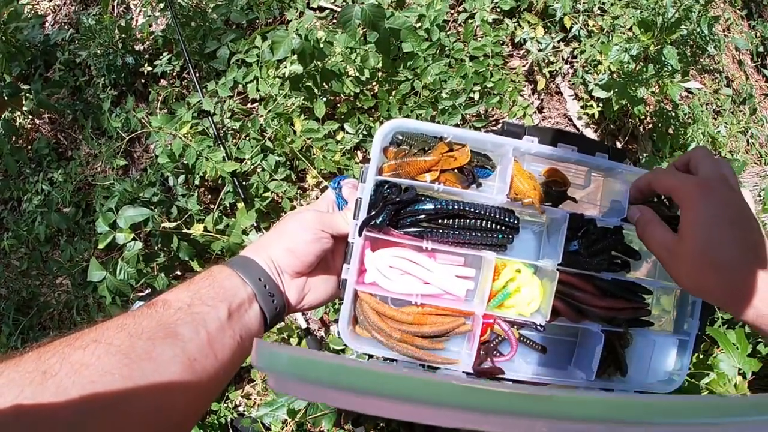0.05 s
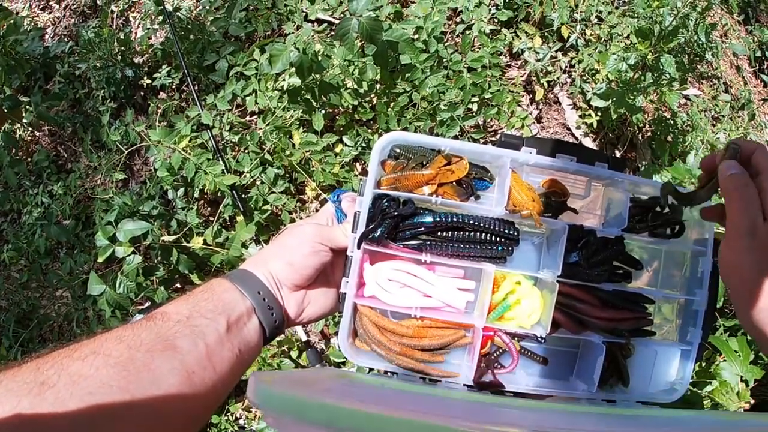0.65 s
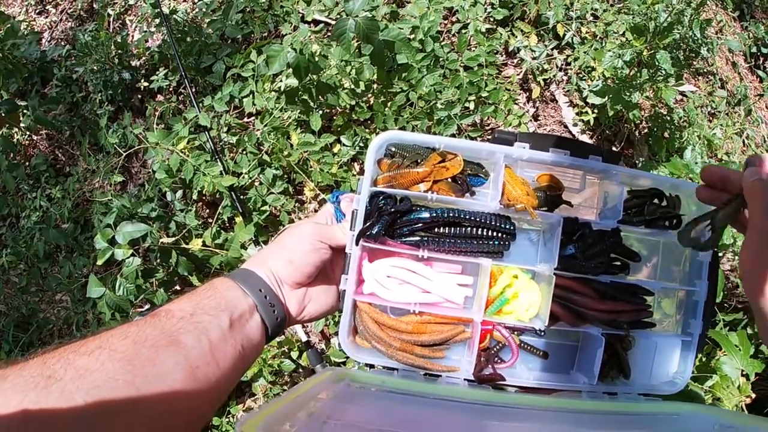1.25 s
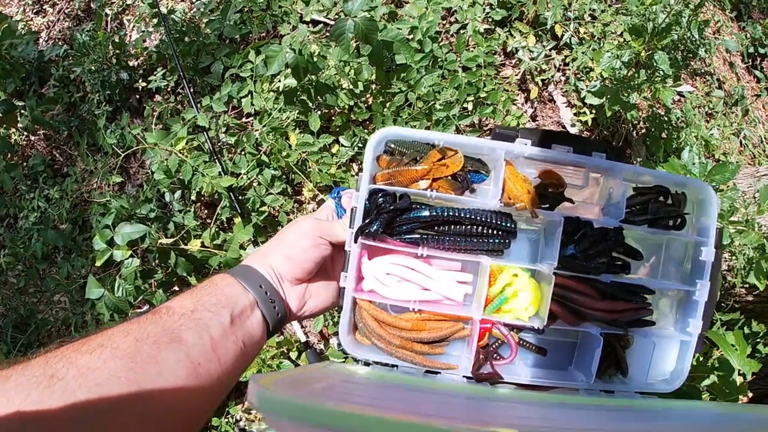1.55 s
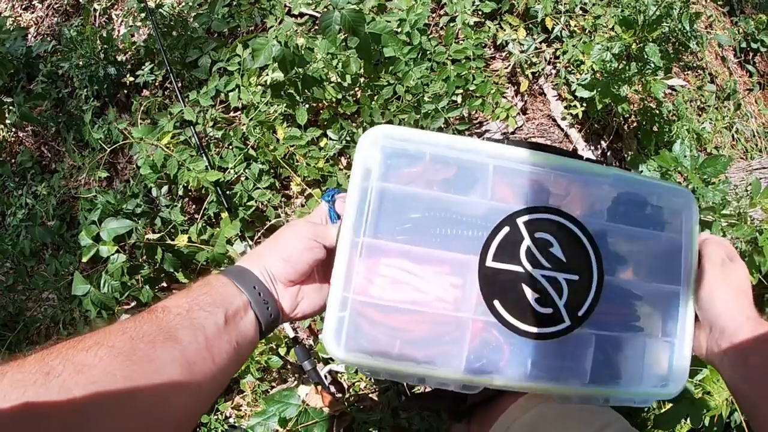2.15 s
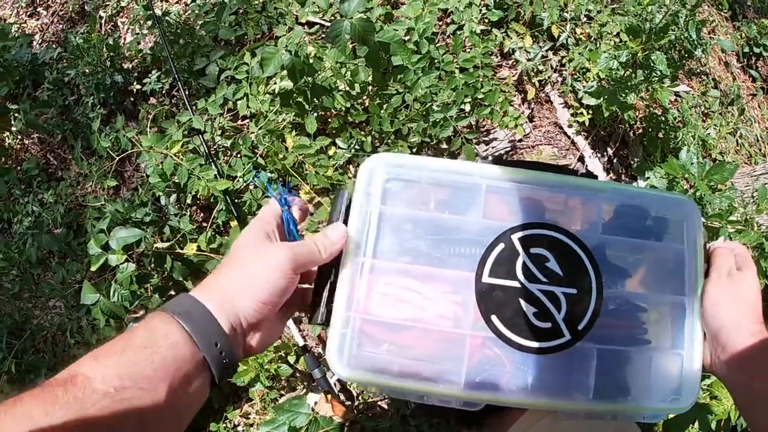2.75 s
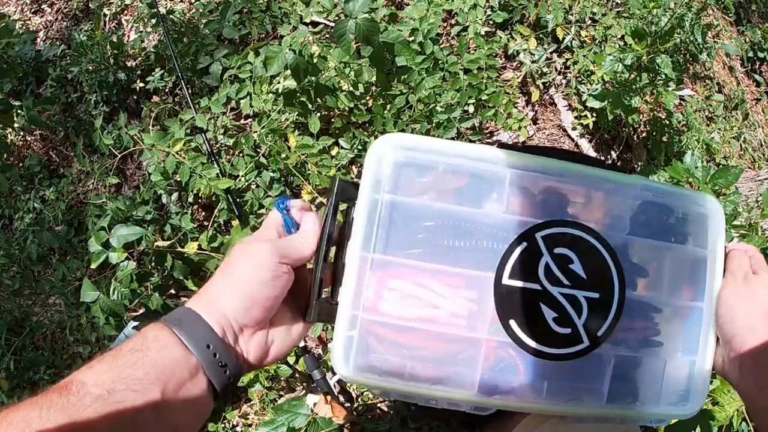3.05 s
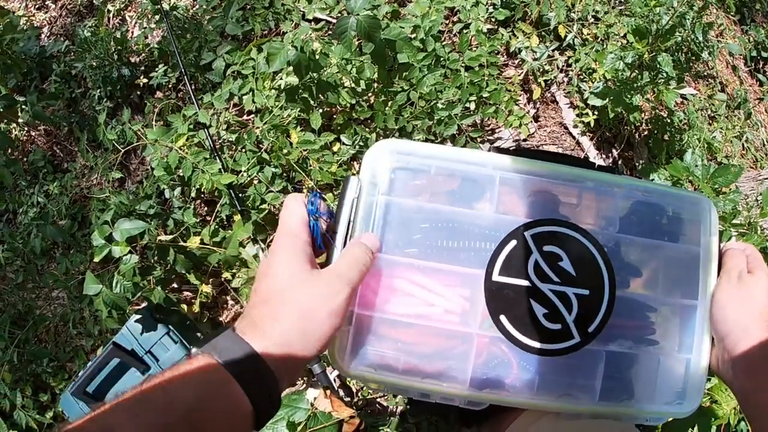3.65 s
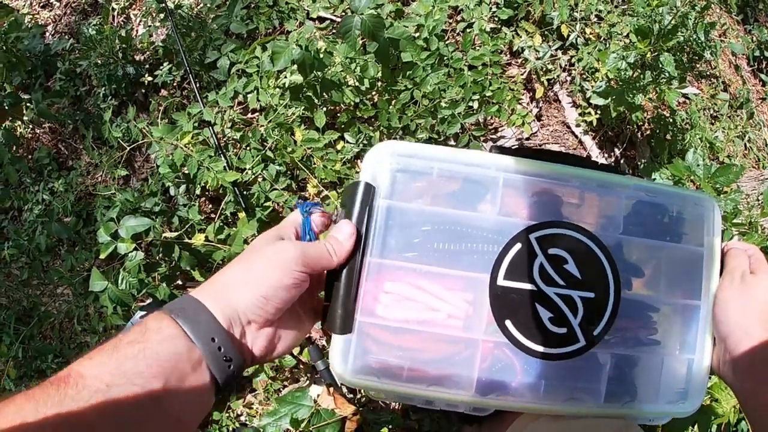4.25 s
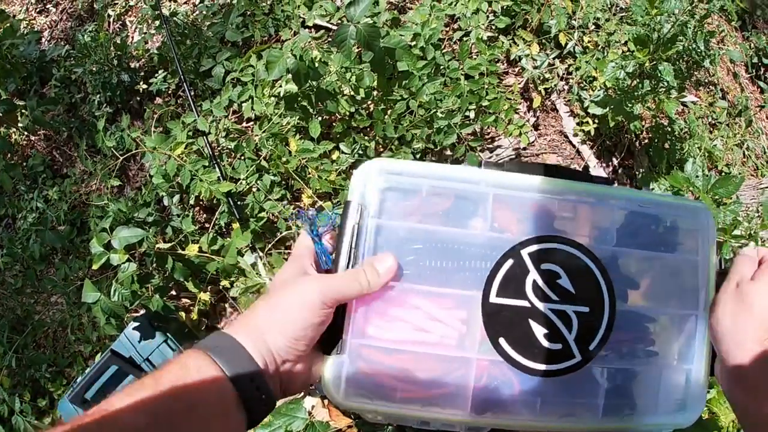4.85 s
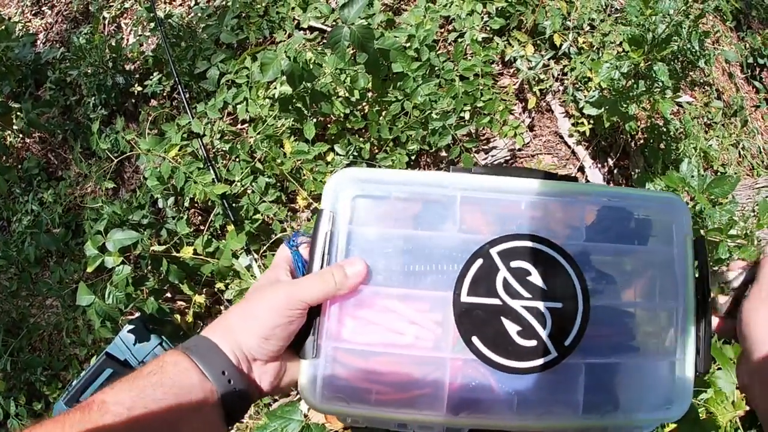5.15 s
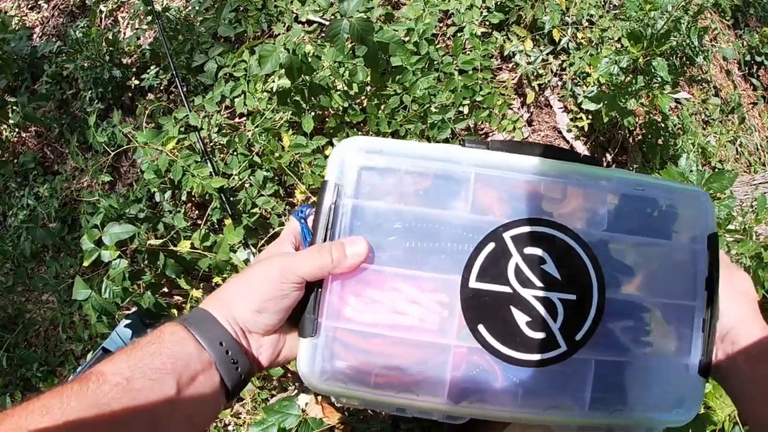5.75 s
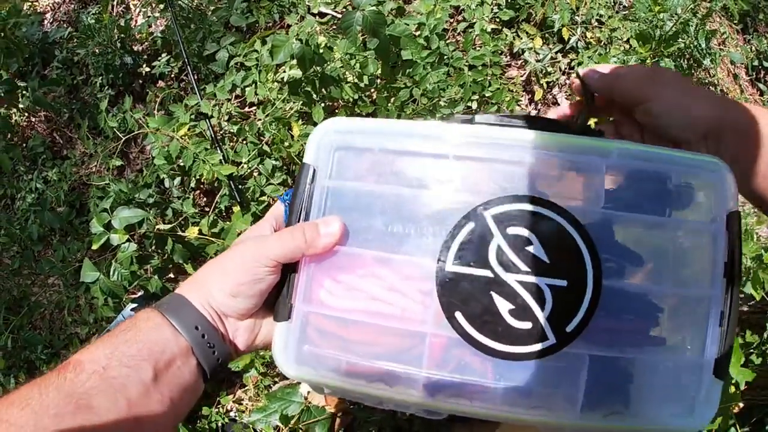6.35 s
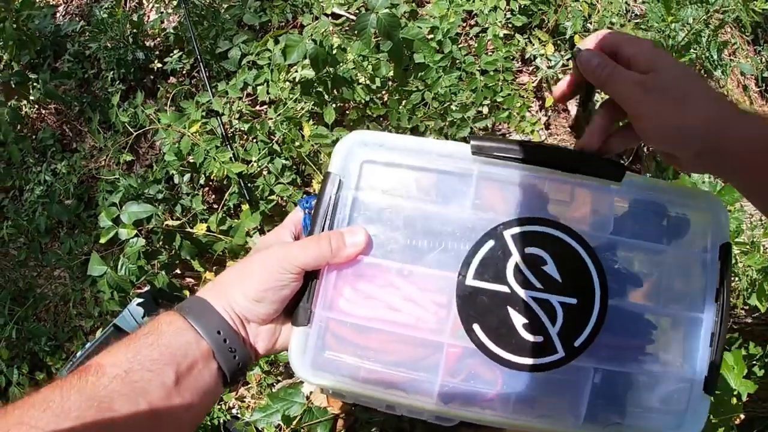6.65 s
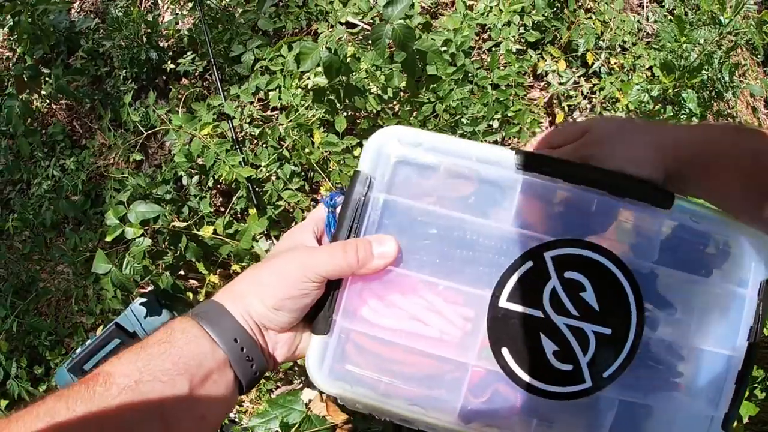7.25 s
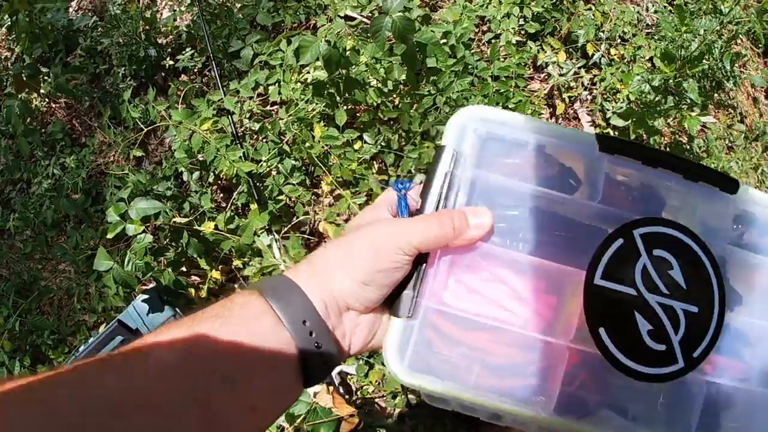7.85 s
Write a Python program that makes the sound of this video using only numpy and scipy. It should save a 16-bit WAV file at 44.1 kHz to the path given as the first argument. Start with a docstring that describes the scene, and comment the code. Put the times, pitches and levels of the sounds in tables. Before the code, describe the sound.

Light clicks in a plastic tackle box, then the lid knocks shut and latches snap closed one by one over faint outdoor air.

```python
"""A tackle box by a pond

Close by, fingers rub a plastic box and pick a lure from its tray with light clicks. The lid swings,
drops shut with a puff of air and is pressed down. The latches snap home, each with a crack of the
thin walls and a thump of the shell. Behind are soft air, a far engine and a thin insect trill."""
import sys
import numpy as np
from scipy import signal
from scipy.fft import rfft, irfft
from scipy.io import wavfile
from scipy.ndimage import map_coordinates

SR = 44100
rng = np.random.default_rng(int(sys.argv[2]) if len(sys.argv) > 2 else 0)


def unload_wav(signal):
    """Save mono or channel-first audio to the path in sys.argv[1] as 16-bit WAV at rate SR, clipped to [-1, 1]."""
    wavfile.write(
        sys.argv[1],
        SR,
        np.round(np.clip(np.atleast_2d(signal).T, -1, 1) * 32767).astype(np.int16),
    )


N = 357210
TIME = np.arange(N) / SR
HIT_TIME = TIME[:SR // 9]   # the time axis of one short contact

# A crack has a level in the mid treble; its "hollow" band lies below that and its "top" band above.
# Hard blows of lid, latch or hand on the shell:
# t/s, crack level/dB, hollow band against crack/dB, crack fade time/s, thump level/dB, thump f/Hz
BLOWS = [(0.36, -64.5, 17, 0.018, -35, 262), (1.6364, -46.5, 8.5, 0.037, -31, 326),
         (1.9326, -43, 8, 0.086, -27, 308), (1.9979, -44.5, 6, 0.045, -23, 551),
         (2.0213, -40.5, 4, 0.2, -8.5, 557), (2.0761, -38.5, -2.5, 0.048, -40, 178),
         (2.2385, -46.5, 0.5, 0.27, -8.5, 363), (2.272, -45.5, 2, 0.064, -21.5, 380),
         (2.316, -52, 7.5, 0.014, -31.5, 598), (2.457, -33.5, 0, 0.018, -21, 346),
         (2.536, -39.5, 5, 0.011, -26, 194), (2.7888, -44, -1.5, 0.13, -28.5, 366),
         (2.8129, -38.5, -6, 0.038, -19, 435), (3.1465, -47, -1, 0.013, -30.5, 388),
         (3.1921, -31.5, -1, 0.037, -10, 475), (3.2147, -33, -2.5, 0.018, -18, 319),
         (3.295, -59, 4, 0.018, -29.5, 354), (3.4456, -52.5, 7, 0.078, -23.5, 427),
         (3.5755, -56, 5.5, 0.04, -37, 366), (3.6353, -49.5, 0, 0.029, -23, 336),
         (4.005, -49.5, 3.5, 0.012, -23.5, 368), (4.0547, -39.5, -6.5, 0.015, -19.5, 313),
         (4.4324, -57, 9.5, 0.015, -29, 341.5), (5.05, -39.5, -3, 0.054, -22.5, 342),
         (5.143, -53.5, 3.5, 0.039, -36, 394), (5.4895, -29.5, -6, 0.0146, -16.5, 548),
         (6.212, -47.5, -3, .11, -31.5, 219), (6.44, -58, 0.5, 0.032, -27.5, 340.5),
         (6.572, -35.5, -4.5, 0.018, -10, 382), (6.61, -39, -4.5, 0.019, -15.5, 383),
         (6.857, -45, -4.5, .025, -15.5, 358), (7.1629, -77.5, 8.5, 0.027, -41, 379.5)]
# Latches going over their catch: t/s, strike level/dB, hollow band against strike/dB, top band
# against strike/dB, travel time/s, release against strike/dB, thump level/dB, thump f/Hz, ping f/Hz
LATCH_SNAPS = [(4.18, -29.5, -12.5, -3, .0017, -2, -9.5, 282.6, 3800),
               (4.555, -23.5, -6, -9, .0019, 1, -9, 337, 1995),
               (5.849, -24, 2, -5.5, 0.0023, -11, -5.5, 264, 734),
               (6.8756, -40, -4, 0, 0.0017, 8, -17, 290, 3600),
               (7.225, -28.5, -1.5, -7.5, 0.0022, -4.5, -2.5, 319, 814)]


def from_db(db):
    """Turn decibels into a factor to multiply by."""
    return 10 ** (np.asarray(db) / 20)


def rms_one(x):
    """Scale a sound so that its average strength (rms) is 1."""
    return x / np.sqrt(np.mean(x ** 2) + 1e-20)


def fade(t60, db=0):
    """The dying away of one contact: it starts at db and loses 60 dB every t60 seconds."""
    return from_db(db - 60 * HIT_TIME / t60)


def in_time(rows):
    """Join a table's points with straight lines: one curve for each column after the time."""
    times, *columns = np.transpose(rows)
    return [np.interp(TIME, times, column) for column in columns]


def band(x, low_hz, high_hz, order=2):
    """Keep the part of a sound between two frequencies."""
    edges_hz = [low_hz, min(high_hz, SR / 2 - 1)]
    return signal.sosfilt(signal.butter(order, edges_hz, "band", fs=SR, output="sos"), x + 1e-18)


def coloured(x, spectrum):
    """Shape the lows and highs of a steady sound by rows of f/Hz, level/dB; the result has rms 1."""
    hz, db = np.transpose(spectrum)
    log_hz = np.log(np.fft.rfftfreq(N, 1 / SR) + 1)
    gain = from_db(np.interp(log_hz, np.log(hz), db, left=-120, right=-120))
    return rms_one(irfft(rfft(x) * gain, N))


def drift(rate, size=N):
    """Wander smoothly, mostly between -1 and 1, through `rate` random values a second."""
    steps = np.arange(size) * rate / SR
    return map_coordinates(rng.standard_normal(int(steps[-1]) + 2), [steps], order=2, mode="nearest")


def add(out, s, sound):
    """Mix a sound into out, starting at s seconds."""
    at = max(round(s * SR), 0)
    out[at:at + len(sound)] += sound[:N - at]


def outdoors(cycle_hz=14.35, waver_rad=0.33):
    """Moving air rumbles softly while a far engine throbs and whines."""
    # Loudness of the air and the engine's hum: t/s, level/dB
    background = [(0, -51), (1.1, -52), (2.6, -51.5), (4.8, -57.5), (5.5, -54.5), (7.6, -61), (8.1, -54.5)]
    # Tone colour of the air: f/Hz, level/dB
    air_spectrum = [(22, -8.5), (45, -1), (80, -7), (120, -2), (200, -4), (300, -11.5), (400, -20),
                    (490, -27), (800, -18), (1050, -31), (1800, -59.5)]
    # Tones of the hum: multiple of the engine's cycle rate, level against the air/dB
    hum_tones = [(3, -10), (4, -6.5), (5, -5.5), (6, -3.5), (7, -22.5)]
    # The engine's whine: t/s, f/Hz, level/dB
    whine_course = [(0, 350, -60), (0.8, 376, -58.5), (4.4, 372, -57.5), (4.8, 378, -64), (8.1, 376, -64)]
    level_db, = in_time(background)
    air = coloured(rng.standard_normal(N), air_spectrum)
    hum = np.zeros(N)
    for multiple, db in hum_tones:
        phase = 2 * np.pi * (multiple * cycle_hz * TIME + rng.random())
        hum += from_db(db) * rms_one(np.sin(phase + waver_rad * drift(3.9)))
    whine_hz, whine_db = in_time(whine_course)
    whine = rms_one(np.sin(2 * np.pi * np.cumsum(whine_hz) / SR + waver_rad * drift(39)))
    flutter_db = drift(6)
    return from_db(level_db) * (air + hum) + whine * from_db(whine_db + flutter_db)


def grip(width_s=0.036, blow_lead_s=0.004, latch_lead_s=0.02):
    """How tightly the hands hold, from 0 to 1: a brief squeeze peaks just before each blow and snap."""
    squeezes = [s - blow_lead_s for s, *_ in BLOWS] + [s - latch_lead_s for s, *_ in LATCH_SNAPS]
    out = np.zeros(N)
    for s in squeezes:
        out = np.maximum(out, 1 / (1 + ((TIME - s) / width_s) ** 4))
    return out


def walls(x, direct_db=-9):
    """The thin walls ring at their own pitches, alongside the bare sound of the contact."""
    # Resonances, the pitches at which the walls ring: f/Hz, width/Hz, level/dB
    resonances = [(760, 770, -6), (1275, 180, 5), (1725, 220, -2), (2150, 900, 4), (3150, 110, -6),
                  (3370, 250, 3), (3680, 92, 1), (4260, 930, 4), (4880, 350, -5.5), (5460, 270, -1),
                  (5880, 620, 4.5), (6610, 540, 2.5), (8200, 420, -6)]
    out = from_db(direct_db) * x
    for hz, width_hz, db in resonances:
        r = np.exp(-np.pi * width_hz / SR)   # share of the ring left after one sample
        feed = (1 - r * r) / 2
        feedback = [1, -2 * r * np.cos(2 * np.pi * hz / SR), r * r]
        out = out + from_db(db) * signal.lfilter([feed, 0, -feed], feedback, x)
    return out


def rubbing(shell_db=1.5, grain_db=-12, slips_per_s=520, ticks_per_s=24, spread_db=3, rest_db=-62):
    """Skin sticks and slips on plastic: tiny ticks over a hiss. Firm rubbing makes the shell rumble."""
    # Fingers sliding on the box: t/s, base rumble level/dB, base scratch level/dB
    finger_course = [(0.0, -56.5, -59), (0.54, -53, -60), (0.83, -58.5, -68), (1.69, -60, -64.5),
                     (2.48, -44.5, -57), (2.77, -46, -61.5), (3.47, -46.5, -63), (3.79, -56, -65.5),
                     (4.37, -53, -64), (4.6, -62, -68.5), (5.16, -48.5, -68), (5.46, -63, -73),
                     (6.02, -53, -69), (6.29, -56, -75), (6.79, -53.5, -69.5), (6.95, -56, -75.5),
                     (7.58, -62.5, -77.5), (8.1, -56, -69.5)]
    # Tone colour of the rumbling shell: f/Hz, level/dB
    shell_spectrum = [(150, -20), (260, -3), (350, 2), (460, -1.5), (620, -4.5), (800, -21.5),
                      (1200, -27.5)]
    # Tone colour of the hissing skin: f/Hz, level/dB
    hiss_spectrum = [(530, -37.5), (900, -7), (1270, -1.5), (1550, -5), (1960, -3), (2690, -6.5),
                     (3170, -5.5), (4510, -5), (8830, -18.5), (15000, -57.5)]
    rumble_db, scratch_db = in_time(finger_course)
    tightness = grip()
    rumble_db += 5.5 * tightness - 3   # a loose hold is quieter, a tight one louder
    scratch_db += tightness - 1
    firmness = 1 / (1 + from_db(2 * (rest_db - rumble_db)))
    sizes = from_db(spread_db * np.minimum(rng.exponential(1, N), 4)) * rng.choice([-1, 1], N)
    slips = rms_one(sizes * (rng.random(N) < slips_per_s / SR))
    shell = coloured(slips + 0.93 * rng.standard_normal(N), shell_spectrum)
    uneven_pushes = from_db(4 * drift(35) - 1.2)
    rumble = firmness * from_db(rumble_db + shell_db) * shell * uneven_pushes
    hiss = coloured(rng.standard_normal(N), hiss_spectrum)
    grains = from_db(grain_db + 1.9 * drift(36)) * rms_one(band(walls(slips), 1100, 8500, order=4))
    big_slips = sizes * (rng.random(N) < ticks_per_s / SR)
    ticks = 0.7 * rms_one(band(walls(big_slips, direct_db=-16), 900, 4200))
    return rumble + from_db(scratch_db) * (hiss + np.sqrt(firmness) * (grains + ticks))


def ribs(t60):
    """Stiff ribs and dividers ring on after a contact, in a slightly different mix each time."""
    # Tones of the ribs and dividers: f/Hz, level/dB
    rib_tones = [(2010, 0.5), (3440, 2), (3800, -11), (5150, -2)]
    ring = sum(from_db(db + rng.normal(0, 2)) * np.sin(2 * np.pi * hz * HIT_TIME)
               for hz, db in rib_tones)
    return rms_one(ring * fade(t60))


def crack(db, hollow_db, top_db, t60, hollow_hz, ring_db, ring_t60,
          tail_db=-36, body_db=-15, hardness=0.6):
    """One contact: a sharp spike, then waves that scatter through the walls. A long contact judders."""
    decay = fade(max(t60, 0.006)) + fade(0.07, tail_db)
    judder = from_db(6.5 * np.minimum(HIT_TIME / 0.0052, 1) * drift(380, size=len(HIT_TIME)))
    force = rng.standard_normal(len(HIT_TIME)) * decay * judder
    force[0] += 0.29   # the spike
    sound = walls(force)
    body = band(force, 350, 1100)
    hollow = band(sound, hollow_hz, 2200, order=3)
    middle = band(sound, 2700, 4900, order=3)
    # harder blows reach higher into the treble
    fizz = from_db(hardness * db + 6.5) * band(sound, 9000, 14000, order=3)
    top = band(sound, 5500, 9300, order=4) + fizz
    parts = [(body, hollow_db + body_db), (hollow, hollow_db), (middle, 0), (top, top_db),
             (ribs(ring_t60), ring_db)]
    scale = np.sqrt(0.01 * SR / len(HIT_TIME))   # levels count as if all the energy came in 10 ms
    return scale * sum(from_db(db + part_db) * rms_one(part) for part, part_db in parts)


def clicks(closing_s=1.6, hollow_db=-2):
    """Lures, dividers and nails tick. Closing the lid makes them hollower and damps the ribs."""
    # Light contacts: t/s, level/dB, top band against that level/dB, fade time/s
    contacts = [(0.1195, -52, -26, 0.021), (0.181, -45.5, -17, 0.024), (0.242, -45, -11.5, .031),
                (0.477, -37, -17, 0.01), (0.572, -40, -5.5, 0.015), (0.58, -47.5, -15, 0.051),
                (0.6042, -44, -4, 0.17), (0.6452, -46, -26, 0.42), (0.681, -44, -4, 0.019),
                (0.711, -33, -20, 0.011), (0.7253, -44, -6, 0.077), (1.3771, -41.5, -0.5, 0.011),
                (1.479, -45, -10, 0.018), (2.034, -50, -22, 0.014), (2.1016, -48.5, -6, .015),
                (3.075, -55, -6, 0.01), (3.202, -35, -12, 0.0068), (4.289, -55.5, -18, .04),
                (4.3681, -54.5, -32, .012), (4.5052, -50, -11.5, 0.14), (4.951, -59.5, -8, 0.036),
                (5.295, -64, -15, 0.019), (6.119, -65.5, -2.5, .16), (6.385, -63.5, -7.5, 0.062),
                (6.795, -63.5, -8.5, .07), (6.991, -63.5, -17, .019), (7.8218, -57.5, -24.5, 0.024)]
    out = np.zeros(N)
    for s, db, top_db, t60 in contacts:
        hollow_hz, ring_db = (1400, -1) if s < closing_s else (950, -8)
        add(out, s, crack(db, hollow_db, top_db, t60, hollow_hz, ring_db, ring_t60=0.018, hardness=0.92))
    return out


def insect(wing_hz=(8700, 7250), lower_db=-3, width_hz=260, pulses_per_s=12, boost_db=1.5):
    """An insect in the weeds makes a thin, throbbing trill as its wings ring at two pitches."""
    # Trills: start t/s, end t/s, base level/dB
    trills = [(0.28, 1.012, -73), (1.6, 2.2, -78.5), (2.7, 3.3, -77), (3.78, 4.276, -78),
              (4.635, 5.055, -85), (5.28, 5.897, -82), (6.896, 7.35, -93)]
    upper, lower = [rms_one(band(rng.standard_normal(N), hz - width_hz / 2, hz + width_hz / 2))
                    for hz in wing_hz]
    swell = np.zeros(N)
    for start, end, db in trills:
        add(swell, start, from_db(db + boost_db) * np.hanning(int((end - start) * SR)))
    throb = 1 + 0.42 * np.sin(2 * np.pi * pulses_per_s * TIME)
    return (upper + from_db(lower_db) * lower) * swell * throb


def thump(s, db, hz, gentle_db=-24, rise_s=0.00064, settle_s=0.0086, sway_hz=58, landing_s=(2.0, 2.05)):
    """The shell rings for a few cycles. Harder hits come with a firmer hold: a shorter, purer ring."""
    force_db = max(db - gentle_db, 0)
    t60 = 0.07 * 2 ** (-force_db / 17.5)
    if landing_s[0] < s < landing_s[1]:
        t60 *= 0.61   # the soft seal of the landing lid cuts the ring short
    upper_db = -10.5 - 0.96 * force_db
    unrest = 1 - np.exp(-(HIT_TIME / settle_s) ** 2)   # shifting contents roughen the tail
    tones = np.zeros(len(HIT_TIME))
    for ratio, tone_db in [(1, 0), (1.65, upper_db), (0.66, -10)]:
        wobble = unrest * drift(220, size=len(HIT_TIME))
        tones += from_db(tone_db) * np.sin(2 * np.pi * hz * ratio * HIT_TIME + wobble)
    onset = 1 - np.exp(-HIT_TIME / rise_s)
    # the ring keeps little deep bass below its tone, apart from a faint sway in the hands
    ring = band(onset * fade(t60, db) * tones, hz * 0.5, hz * 20)
    sway = onset * fade(0.16, db - 31) * np.sin(2 * np.pi * sway_hz * HIT_TIME)
    return ring + sway


def blows(flex_lag_s=0.0022):
    """A hard blow cracks, and the shell bends with a thump just after."""
    out = np.zeros(N)
    for s, db, hollow_db, t60, thump_db, thump_hz in BLOWS:
        top_db = -7.5 - 0.67 * hollow_db   # the hollower the crack, the duller its top
        add(out, s, crack(db, hollow_db, top_db, t60, hollow_hz=950, ring_db=-8, ring_t60=0.016,
                          body_db=-14, hardness=0.66))
        add(out, s + flex_lag_s, thump(s, thump_db, thump_hz))
    return out


def hinge(peak_s=1.743, width_s=0.042, level_db=-57):
    """The hinge rubs softly as the lid swings over."""
    rub = rms_one(band(rng.standard_normal(N), 1350, 1700))
    return from_db(level_db) * rub * np.exp(-((TIME - peak_s) / width_s) ** 2)


def knocks():
    """Palm, seal and soft lures are too padded to crack; they only make the shell thump. One row, at 5.494 s,
    is a deeper second thump of the blow just before it."""
    # Padded contacts, and the second thump of the blow at 5.49 s: t/s, level/dB, main tone f/Hz
    contacts = [(1.855, -25.5, 108), (1.97, -27, 99), (2.007, -22, 537), (2.039, -8, 282),
                (2.256, -15, 357), (2.3886, -25, 380), (2.44, -22.5, 347), (2.8317, -23.5, 314),
                (2.9375, -32, 373), (3.6003, -28, 350), (4.0754, -22, 370), (5.386, -29.5, 86),
                (5.494, -14.5, 228.3), (5.7133, -39, 97), (6.1444, -28, 138), (6.583, -17, 233),
                (7.0883, -38.5, 264), (7.4633, -41.5, 230), (7.9034, -37, 177), (7.9524, -38, 336)]
    out = np.zeros(N)
    for s, db, hz in contacts:
        add(out, s, thump(s, db, hz))
    return out


def lid_puff(peak_s=2.035, width_s=0.049, level_db=-32):
    """The falling lid pushes a low puff of air out of the box."""
    air = rms_one(band(rng.standard_normal(N), 30, 225))
    return from_db(level_db) * air * np.exp(-((TIME - peak_s) / width_s) ** 2)


def latches(boost_db=1, snap_t60=0.011, creak_lead_s=0.011, creak_db=-30, flex_lag_s=0.0016):
    """A latch creaks over its ridge, slips off and strikes the box: the latch pings, the shell thumps."""
    out = np.zeros(N)
    for s, db, hollow_db, top_db, travel_s, release_db, thump_db, thump_hz, ping_hz in LATCH_SNAPS:
        # three cracks: delay/s, level against the strike/dB, fade time/s
        creak = (-creak_lead_s, creak_db, 0.051)
        release = (0, release_db, snap_t60)
        strike = (travel_s, 0, snap_t60)
        for delay_s, step_db, t60 in (creak, release, strike):
            sound = crack(db + step_db, hollow_db, top_db, t60, hollow_hz=700, ring_db=-4,
                          ring_t60=0.014, tail_db=-42, body_db=-9)
            add(out, s + delay_s, from_db(boost_db) * sound)
        ping = fade(0.019, db + 6) * np.sin(2 * np.pi * ping_hz * HIT_TIME)
        add(out, s + travel_s, ping)
        add(out, s + travel_s + flex_lag_s, thump(s, thump_db, thump_hz))
    return out


def surroundings(x, scatter_db=-35, t60=0.36):
    """The bank and trees send back two faint echoes, and the leaves scatter a thin wash of sound."""
    # Echoes: delay t/s, level/dB
    echoes = [(0.0403, -46), (0.068, -39.5)]
    t = TIME[:SR // 2]
    response = rng.standard_normal(len(t)) * from_db(-60 * t / t60) * np.minimum(t / 0.01, 1)
    response *= from_db(scatter_db) / np.linalg.norm(response)
    for delay_s, db in echoes:
        add(response, delay_s, [from_db(db)])
    return band(signal.fftconvolve(x, response)[:N], 150, 9000, order=1)


def scene():
    """The box is close, with hardly any echo; left and right carry the same sound."""
    hits = clicks() + blows() + latches() + knocks()
    sound = hits + surroundings(hits) + hinge() + lid_puff() + rubbing() + outdoors() + insect()
    return np.array([sound, sound])


def record(dry):
    """Round off the loudest peaks and cut the highest treble."""
    ceiling, cutoff_hz = 0.6, 16000
    rounded = dry / (1 + (dry / ceiling) ** 4) ** 0.25
    return signal.sosfilt(signal.ellip(10, 0.1, 80, cutoff_hz, fs=SR, output="sos"), rounded)


dry = scene()
out = record(dry)
unload_wav(out)
```